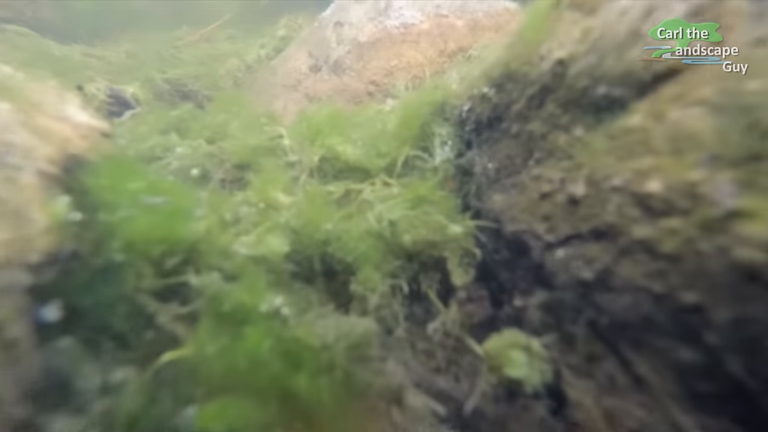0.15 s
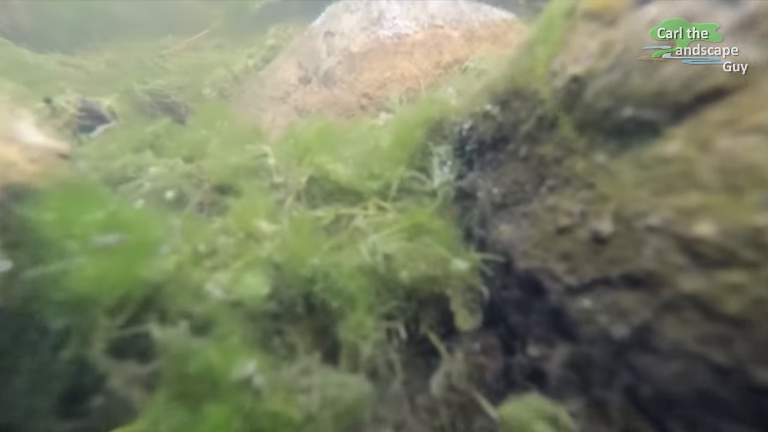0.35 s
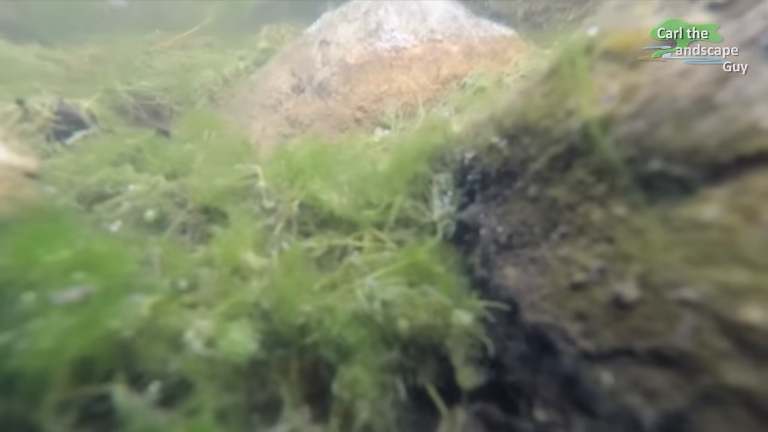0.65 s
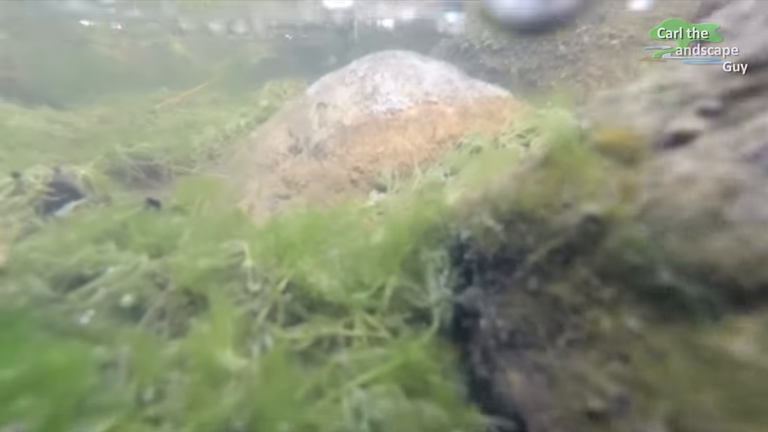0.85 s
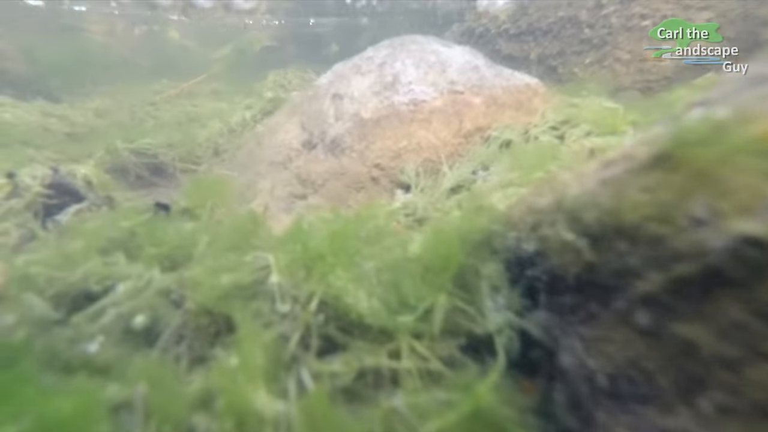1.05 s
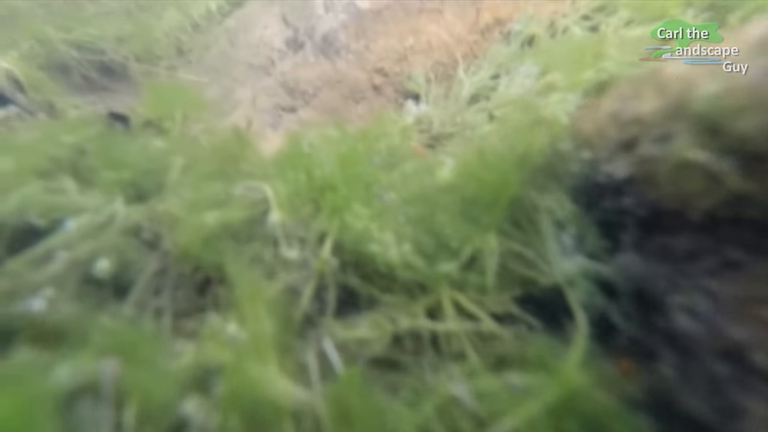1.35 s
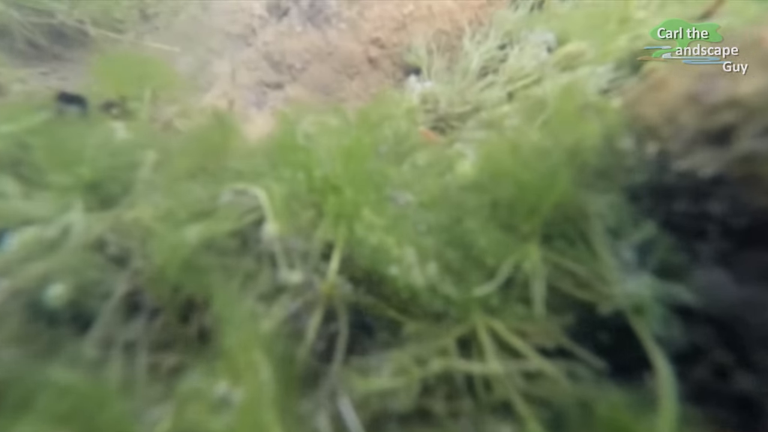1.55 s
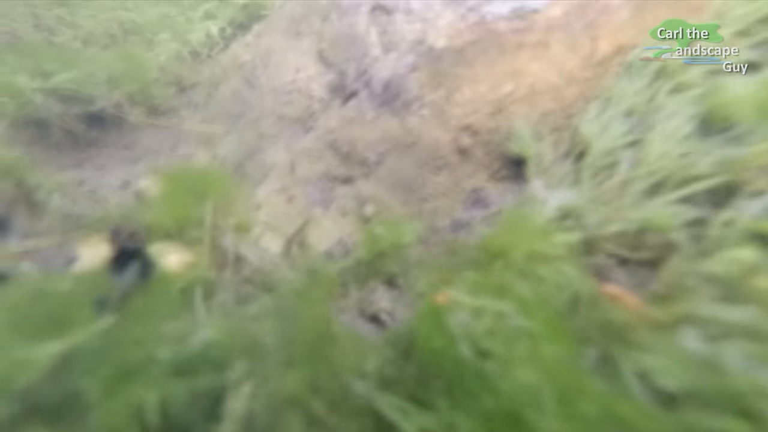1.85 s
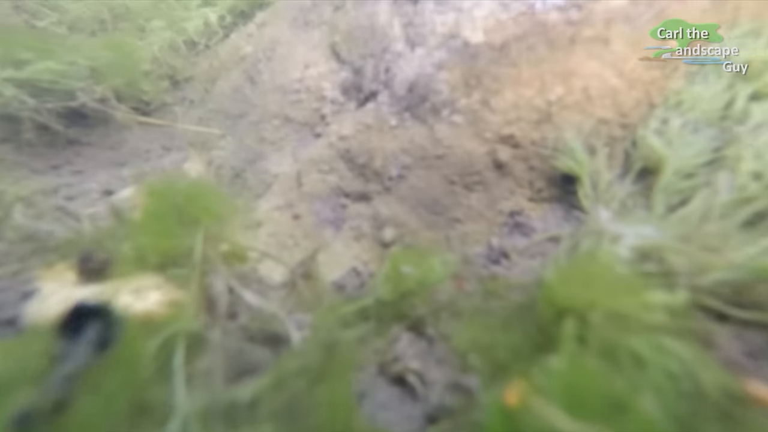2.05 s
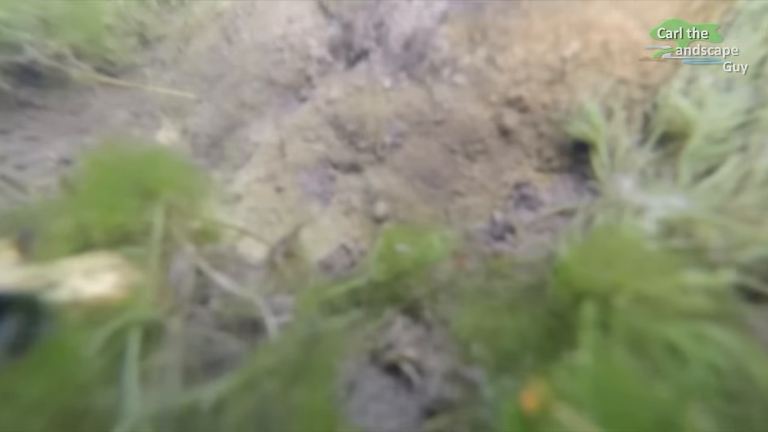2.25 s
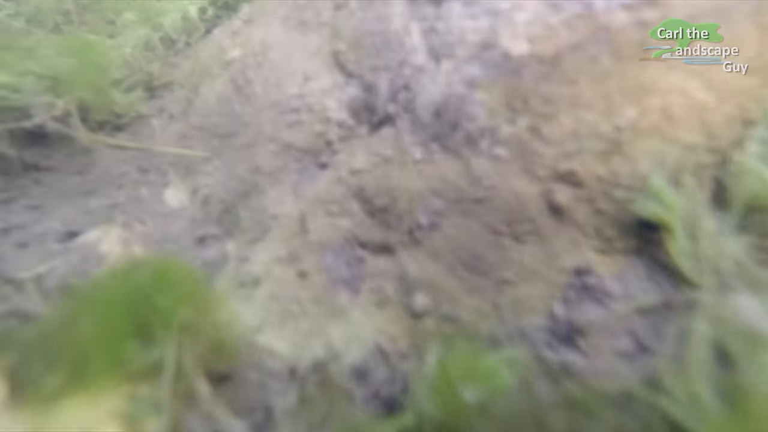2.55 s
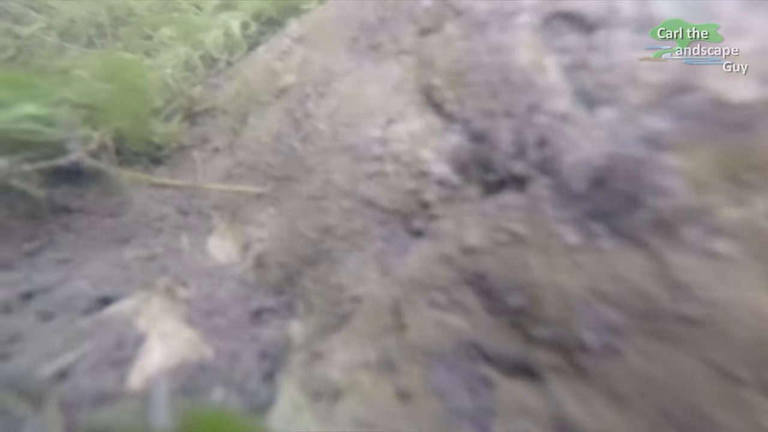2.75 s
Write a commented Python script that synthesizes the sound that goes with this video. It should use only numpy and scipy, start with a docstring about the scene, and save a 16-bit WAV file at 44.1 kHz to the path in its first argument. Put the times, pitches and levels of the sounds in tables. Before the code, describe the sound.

Water weeds scrape and bump an underwater camera housing as it pushes along a stream bed

```python
"""A small camera in a sealed housing is pushed through weeds on the bed of a shallow stream.
From the start the stream babbles faintly, small bubbles ping and the current rumbles on the housing.
Soft thumps soon follow, then stems scrape and shove along the housing in strokes and some knock it.
Later the camera lurches too, in low pulses. The strokes end first; babble and bubbles close the scene.
Noise and clicks are shaped by filters; knocks and bubbles are fading sine waves."""
import sys
import numpy as np
from scipy import signal
from scipy.io import wavfile
from scipy.ndimage import uniform_filter1d

SR = 44100
rng = np.random.default_rng(int(sys.argv[2]) if len(sys.argv) > 2 else 0)


def put_to_file(sound):
    """Save the sound as 16-bit audio at rate SR, in the file named by the first command-line argument."""
    columns = np.atleast_2d(sound).T  # one column per channel
    safe = np.clip(columns, -1, 1)
    whole_steps = np.round(safe * 32767)
    wavfile.write(sys.argv[1], SR, whole_steps.astype(np.int16))


def convert_level_to_amplitude(level_db):
    """Map a level in decibels to its linear amplitude factor."""
    exponent = np.asarray(level_db, float) / 20
    return 10 ** exponent


N = 127890
T = np.arange(N) / SR  # time of every sample, s


def evened(x):
    """Scales a sound to an rms of 1."""
    return x / np.sqrt(np.mean(x ** 2) + 1e-20)


def curve(rows, axis=1):
    """Gain along time, drawn through a column of dB points."""
    columns = np.transpose(rows)
    return convert_level_to_amplitude(np.interp(T, columns[0], columns[axis]))


def coloured(x, points):
    """Filters a sound to the given spectrum without any ringing ahead of time, then evens it."""
    f, db = np.transpose(points)
    bins = abs(np.fft.fftfreq(8192, 1 / SR))
    gain_db = np.interp(np.log(bins + 1), np.log(f), db)
    log_gain = np.log(convert_level_to_amplitude(np.maximum(gain_db, -90)))
    # minimum phase: the filter answers as early as its spectrum allows
    taps = np.fft.ifft(np.exp(np.conj(signal.hilbert(log_gain)))).real[:4096]
    return evened(signal.oaconvolve(x, taps)[:N])


def train(per_s, spread_db):
    """Random clicks of random sign, a few of them large."""
    u = rng.random((N, 3))
    happens = u[:, 0] < per_s / SR
    sign = np.sign(u[:, 1] - .5)
    size = convert_level_to_amplitude(-spread_db * np.log(u[:, 2] + 1e-3))
    return happens * sign * size


def grains(per_s, spread_db, low_hz, high_hz, cycles, glide, count=16):
    """Short ringing grains of many pitches, each pitch on its own random train."""
    out = np.zeros(N)
    t = np.arange(int(SR * .06)) / SR
    for hz in np.geomspace(low_hz, high_hz, count):
        turns = t * hz / cycles
        bent = turns * np.exp(glide * np.minimum(turns, 2))  # glide above 0 raises the pitch
        ring = turns * np.exp(-2 * turns) * np.sin(2 * np.pi * cycles * bent)
        clicks = train(per_s / count, spread_db)
        out += signal.oaconvolve(clicks, ring / np.linalg.norm(ring))[:N]
    return evened(out)


def add(mix, s, sound):
    """Mixes a sound in at time s."""
    part = mix[max(round(s * SR), 0):][:len(sound)]
    part += sound[:len(part)]


# Loudness of the fizz and the haze: [t/s, high fizz level/dB, mid haze level/dB]
FIZZ_LEVELS = [(0, -87.5, -77.5), (.82, -77.5, -83.5), (.87, -74.5, -100), (1.15, -69.5, -75),
               (1.7, -94, -100), (2.9, -88, -86)]
# Tone of the high fizz: [f/Hz, relative level/dB per Hz]
FIZZ_COLOUR = [(5500, -33), (7000, -7.5), (8500, -6), (10000, -15), (11500, -19.5)]
# Tone of the mid haze: [f/Hz, relative level/dB per Hz]
HAZE_TONE = [(1900, -43.5), (2500, -2), (6500, -10), (9000, -20)]


def fizz_and_haze():
    """A faint high fizz of noise whose level flutters, over a steadier haze of lower noise."""
    flutter_db = 5.2 * evened(uniform_filter1d(rng.standard_normal(N), size=150))
    fizz = coloured(rng.standard_normal(N) * convert_level_to_amplitude(flutter_db), FIZZ_COLOUR)
    haze = coloured(rng.standard_normal(N), HAZE_TONE)
    return curve(FIZZ_LEVELS) * fizz + curve(FIZZ_LEVELS, axis=2) * haze


# Loudness of the distant bubbles in the babble: [t/s, level/dB]
BABBLE_LEVELS = [(0.0, -57), (1.56, -67.5), (2.76, -65.5), (2.9, -73)]
# Tone of the soft wash under them: [f/Hz, relative level/dB per Hz]
WASH_COLOUR = [(88, -40), (150, -5.5), (381, 0.5), (965, -5), (1170, -18), (1320, -20), (1800, -1.5),
               (2600, -34), (3380, -75.5)]


def babble():
    """Many distant bubbles ring as short grains, over a soft wash of noise."""
    far = grains(per_s=500, spread_db=3.2, low_hz=1041.3, high_hz=1942, cycles=11.6, glide=0.025)
    wash = convert_level_to_amplitude(-2) * coloured(rng.standard_normal(N), WASH_COLOUR)
    return curve(BABBLE_LEVELS) * (far + wash)


# Loudness of the current against the housing: [t/s, level/dB]
RUMBLE_LEVELS = [(0, -59), (2.9, -51.5)]
# Tone of that rumble, also used for the sway under the strokes: [f/Hz, relative level/dB per Hz]
RUMBLE_TONE = [(12, -19), (25, -3), (45, -7), (70, -13.5), (120, -20), (250, -36.5), (600, -88)]


def rumble():
    """The current presses unevenly on the housing, heard as low filtered noise."""
    return curve(RUMBLE_LEVELS) * coloured(rng.standard_normal(N), RUMBLE_TONE)


# Small bubbles nearby: [t/s, level/dB, starting f/Hz]
NEAR_BUBBLES = [(0.014, -39.5, 1860), (0.022, -43.5, 1463), (0.0706, -43.5, 1547), (0.0771, -38, 1205),
                (0.168, -46.5, 1520), (0.592, -34, 1510), (0.859, -43, 1840), (1.037, -42.5, 1885),
                (1.464, -32, 1640), (1.522, -30.5, 1190), (1.8052, -37, 1890), (1.8348, -44, 1844),
                (1.8954, -43.5, 1860), (2.1003, -42.5, 1925), (2.125, -43.5, 1370), (2.275, -42, 1206),
                (2.437, -43.5, 1906), (2.574, -45.5, 1880), (2.62, -40, 1778), (2.704, -49.5, 1600),
                (2.7236, -45, 1594), (2.7538, -45, 1630)]


def bubbles():
    """Each bubble pings with a slight rise in pitch, a larger neighbour beating under it."""
    t60_s, rise_s, glide = .04, .0012, .04
    partner_pitch, partner_db = .76, -6.  # pitch as a share of the first bubble's
    out, t = np.zeros(N), np.arange(int(SR * .06)) / SR
    shape = (1 - np.exp(-t / rise_s)) ** 2 * convert_level_to_amplitude(-60 * t / t60_s)
    for s, db, hz in NEAR_BUBBLES:
        phase = 2 * np.pi * hz * t * (1 + glide * t / t60_s)
        pair = np.sin(phase) + convert_level_to_amplitude(partner_db) * np.sin(partner_pitch * phase)
        add(out, s, convert_level_to_amplitude(db) * shape * pair)
    return out


# The camera lurches in the current: [t/s of the middle, level/dB, f/Hz]
LURCH_PULSES = [(0.707, -30.5, 131), (0.948, -30.5, 60), (1.102, -27.5, 57), (1.151, -29.5, 60),
                (1.196, -30, 60), (1.549, -23.5, 41.4), (1.568, -25, 44.8), (1.739, -23.5, 51.3),
                (1.934, -27, 59), (1.978, -26.5, 44.6), (2.207, -26.5, 104), (2.282, -28, 105),
                (2.318, -29, 68), (2.481, -27.5, 42.2), (2.555, -31.5, 40)]


def lurches():
    """Each lurch is one dip and hump of pressure, about a cycle long."""
    width_cycles, lean_rad = 0.33, 0.44
    out = np.zeros(N)
    for s, db, hz in LURCH_PULSES:
        cycles = hz * (T - s)
        swell = np.exp(-(cycles / width_cycles) ** 2 / 2)
        out += convert_level_to_amplitude(db) * swell * np.cos(2 * np.pi * cycles - lean_rad)
    return out


# Hollow ring of the housing under a thump: [f/Hz, level/dB, time to fall 60 dB/s]
HOLLOW_RING = [(840, -1.5, 0.0073), (1386, -9.5, 0.0074)]


def thump_sound(t):
    """Water gives way under a blow: a tone sliding down in pitch, with a hollow ring of the housing."""
    start_hz, fall_s = 1000., .0011  # the pitch has halved after fall_s
    t60_s, rise_s, level_db = .045, .002, 3.
    swell = (1 - np.exp(-t / rise_s)) ** 2 * convert_level_to_amplitude(level_db - 60 * t / t60_s)
    slide = np.cos(2 * np.pi * start_hz * fall_s * np.log(1 + t / fall_s))
    hollow = sum(convert_level_to_amplitude(db - 60 * t / t60) * np.sin(2 * np.pi * hz * t) for hz, db, t60 in HOLLOW_RING)
    return swell * slide + hollow * np.minimum(t / fall_s, 1)


# Ringing tones of the housing: [f/Hz before detuning, relative level/dB, time to fall 60 dB/s]
TICK_TONES = [(2155, 7, 0.011), (3210, 2, 0.0052), (4480, 3.5, 0.0033), (7000, 1.5, 0.0014)]


def tick_sound(t, detune):
    """A hard tap sets the housing ringing at several fading tones."""
    rise_s, level_db = .0003, -7.
    ring = np.zeros(len(t))
    for (hz, db, t60), k in zip(TICK_TONES, detune):
        ring += convert_level_to_amplitude(db - 60 * t / t60) * np.sin(2 * np.pi * hz * k * t)
    return convert_level_to_amplitude(level_db) * (1 - np.exp(-t / rise_s)) * ring


# Knocks on the housing: [t/s, gain of the whole knock level/dB, further gain of its thump level/dB]
KNOCK_TIMES = [(0.2222, -68, 38.5), (0.2417, -64, 39.5), (0.254, -68, 35.5), (0.268, -70, 36),
               (0.2795, -62, 29), (0.369, -41.5, -9), (0.4753, -25.5, 2.5), (0.5108, -37.5, 5),
               (0.6348, -36, 3), (0.6505, -30, 1), (0.7228, -47, -19), (0.8055, -29, 9.5),
               (0.8185, -36, 16.5), (0.8255, -38.5, 12.5), (1.0919, -31.5, -1.5), (1.4719, -26.5, -7),
               (1.9243, -39, 17), (1.9809, -39, -30), (2.097, -45, -18), (2.1697, -34, -6),
               (2.3345, -64.5, 33.5), (2.3569, -41.5, -2), (2.3705, -51.5, 6), (2.393, -55, 3),
               (2.4666, -40.5, 4)]


def knocks():
    """Each knock joins a tick of the housing, a little different every time, to a thump."""
    out, t = np.zeros(N), np.arange(int(SR * .08)) / SR
    thump = thump_sound(t)
    detune = rng.uniform(0.912, 0.98, (len(KNOCK_TIMES), len(TICK_TONES)))
    for (s, db, thump_db), factors in zip(KNOCK_TIMES, detune):
        add(out, s, convert_level_to_amplitude(db) * (tick_sound(t, factors) + convert_level_to_amplitude(thump_db) * thump))
    return out


def stem_slips():
    """Stems stick and slip in dense clicks whose strength chatters quickly and clumps slowly."""
    slips_per_s, spread_db = 6000, 2
    chatter_hz, chatter_db, clump_db = 117, 2.5, 2.
    keep = np.exp(-2 * np.pi * chatter_hz / SR)
    chatter = evened(signal.lfilter([1], [1, -keep], rng.standard_normal(N)))
    clump = evened(uniform_filter1d(rng.standard_normal(N), size=900))
    return train(slips_per_s, spread_db) * convert_level_to_amplitude(chatter_db * chatter) * convert_level_to_amplitude(clump_db * clump)


# Tone the housing gives the scrape: [f/Hz, relative level/dB per Hz]
SCRAPE_COLOUR = [(210, -26), (350, 3.5), (950, -13), (1430, -7), (1880, -4.5), (2120, 3.5), (2400, -8.5),
                 (4150, -13), (4550, -23.5), (7500, -29), (11100, -47), (14500, -95)]


def scraping(scrape, sharp, slips):
    """The slips heard through the housing, with extra treble where a stroke is short."""
    treble_from_hz, level_db = 4580, 6.5
    body = coloured(slips, SCRAPE_COLOUR)
    high_pass = signal.butter(4, treble_from_hz, "high", fs=SR, output="sos")
    treble = evened(np.gradient(signal.sosfilt(high_pass, body)))
    return convert_level_to_amplitude(level_db) * (scrape * body + sharp * treble)


# Tone of the dull rub: [f/Hz, relative level/dB per Hz]
RUB_COLOUR = [(150, -41.5), (400, 0), (1100, 0.5), (2100, -2), (2500, -51)]


def rubbing(push, slips):
    """The same slips as a dull rub that follows the push of the stems."""
    return convert_level_to_amplitude(-17) * push * coloured(slips, RUB_COLOUR)


def shoving(push):
    """Stems shove the housing in low lumps that sink in pitch, over a low sway of noise."""
    lumps = grains(per_s=220, spread_db=1, low_hz=78.5, high_hz=308, cycles=1.675, glide=-0.27)
    sway = convert_level_to_amplitude(-8.5) * coloured(rng.standard_normal(N), RUMBLE_TONE)
    # the smoothing, in samples, softens the edges of the push
    return uniform_filter1d(push, size=300) * lumps + uniform_filter1d(push, size=2000) * sway


def shed_bubbles(scrape, push):
    """Bubbles shaken off the stems ring while a stroke both scrapes and pushes."""
    shed = grains(per_s=270, spread_db=3.5, low_hz=1255, high_hz=2137, cycles=7.4, glide=0.019, count=8)
    return convert_level_to_amplitude(-6) * np.sqrt(push * scrape) * shed


# Strokes of weeds along the housing, gains ahead of each layer's own level:
# [t/s, length/s, scrape level/dB at mid-stroke, rise of the scrape over the stroke/dB, push level/dB]
WEED_STROKES = [(0.216, 0.091, -116, -4, -48), (0.469, 0.083, -64, 0, -40.5), (0.553, 0.046, -76, -1, -50),
                (0.614, 0.048, -59.5, 20, -41), (0.673, 0.037, -54, 0, -38.5),
                (0.723, 0.054, -71, -13, -43), (0.782, 0.024, -61.5, -7, -39), (0.807, 0.02, -52, 0, -34),
                (0.832, 0.015, -64.5, 0, -39), (0.931, 0.18, -70.5, 9.5, -43.5),
                (1.083, 0.032, -62, 0, -54), (1.111, 0.049, -67, 11, -39), (1.169, 0.054, -62, -12.5, -40),
                (1.206, 0.051, -86, 17, -41.5), (1.255, 0.0977, -56, 7.5, -41),
                (1.354, 0.1925, -49.5, -3.5, -35.5), (1.555, 0.097, -57, -12.5, -39.5),
                (1.651, 0.13, -70.5, 15.5, -40), (1.922, 0.047, -49.5, -6.5, -31.5),
                (1.96, 0.062, -69.5, 18.5, -60), (2.159, 0.1694, -59, 5.5, -42),
                (2.455, 0.018, -78.5, 4, -69), (2.468, 0.082, -71.5, 17, -39)]


def weeds():
    """Stems slip along the housing and shove it, stroke by stroke."""
    edge_s = 0.007
    scrape_release, push_release = 2984, 1307  # dB/s
    bright_length_s, bright_slope = convert_level_to_amplitude(-36), 0.77  # the shorter the stroke, the more treble
    scrape, sharp, push = np.zeros((3, N))
    for s, length, scrape_db, rise_db, push_db in WEED_STROKES:
        inside = np.clip((T - s) / edge_s + .5, 0, 1) ** 2
        after = np.maximum(T - s - length, 0)
        progress = np.clip((T - s) / length - .5, -.5, .5)
        level = inside * convert_level_to_amplitude(scrape_db + rise_db * progress - scrape_release * after)
        scrape += level
        sharp += level * (bright_length_s / length) ** bright_slope
        push += inside * convert_level_to_amplitude(push_db - push_release * after)
    slips = stem_slips()
    contact = scraping(scrape, sharp, slips) + rubbing(push, slips)
    return contact + shoving(push) + shed_bubbles(scrape, push)


def scene():
    """Everything that reaches the microphone inside the housing."""
    stream = fizz_and_haze() + babble() + rumble()
    return (stream + bubbles() + lurches() + knocks() + weeds())[None]


def band_limit(x):
    """A steep low-pass at the top of the band."""
    return signal.sosfilt(signal.butter(12, 11280, fs=SR, output="sos"), x)


def record(dry):
    """Turns the finished mix into the sound that is kept."""
    return band_limit(dry)


dry = scene()
out = record(dry)
put_to_file(out)
```